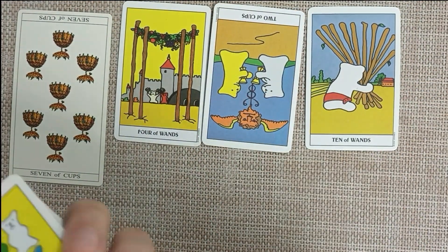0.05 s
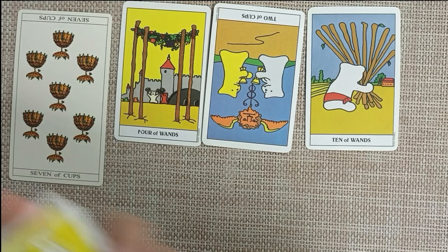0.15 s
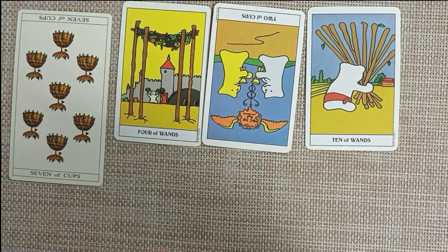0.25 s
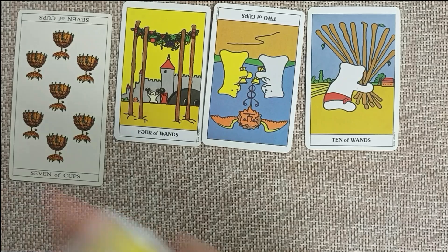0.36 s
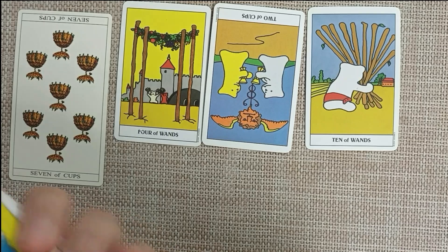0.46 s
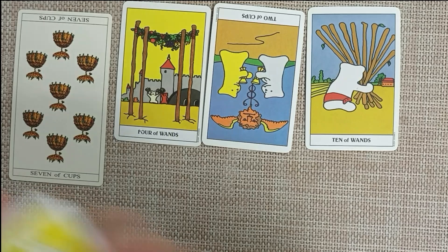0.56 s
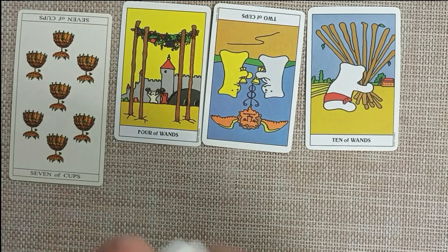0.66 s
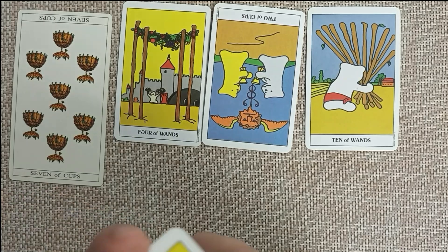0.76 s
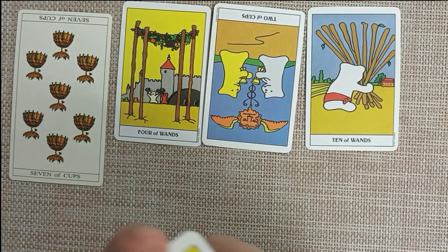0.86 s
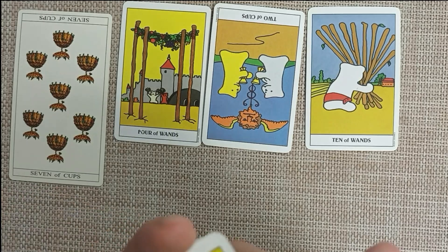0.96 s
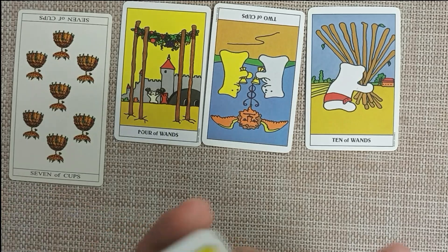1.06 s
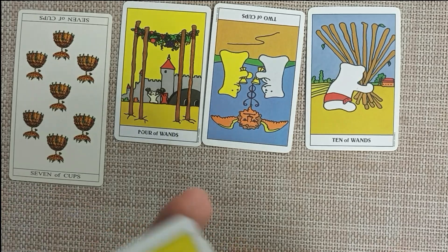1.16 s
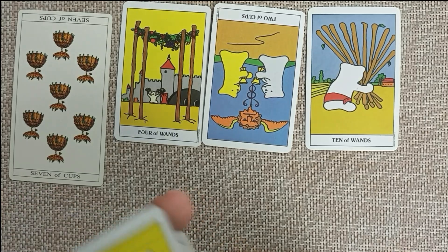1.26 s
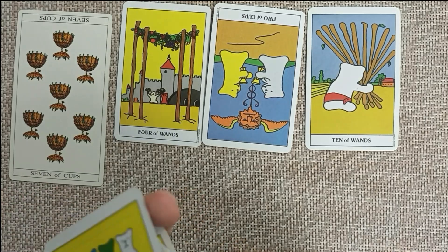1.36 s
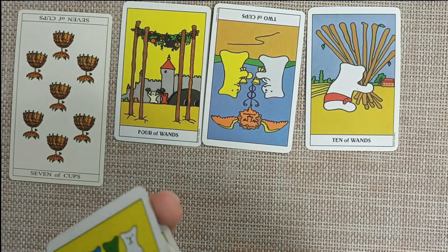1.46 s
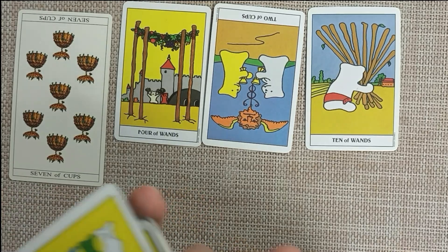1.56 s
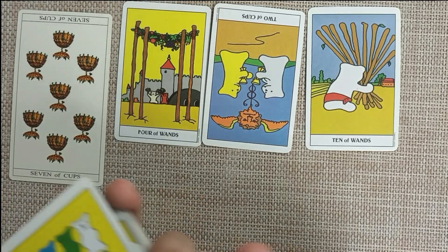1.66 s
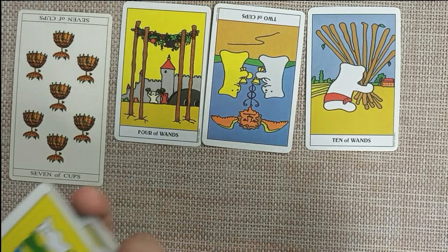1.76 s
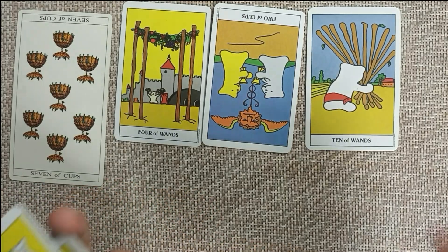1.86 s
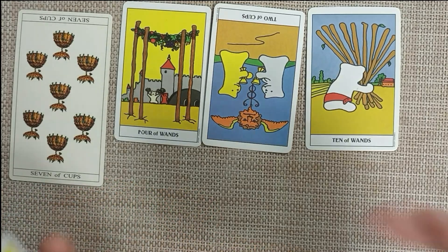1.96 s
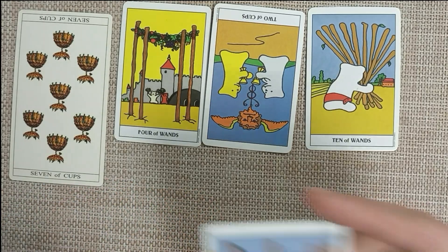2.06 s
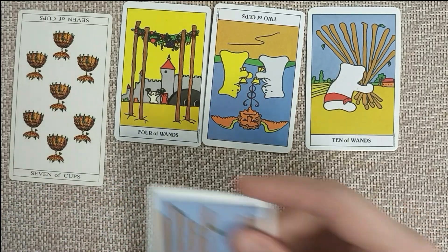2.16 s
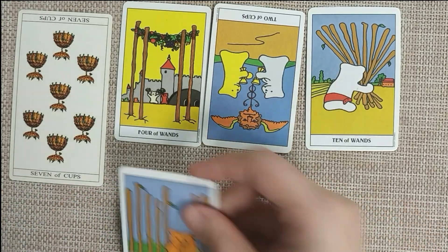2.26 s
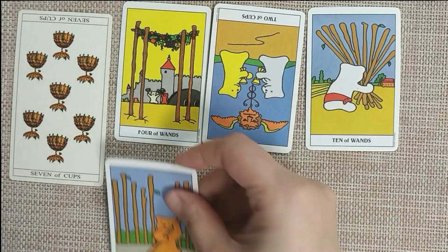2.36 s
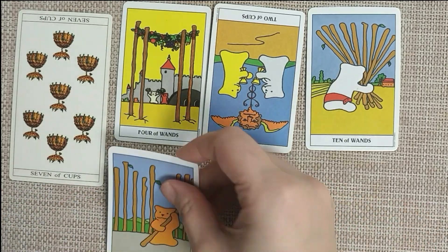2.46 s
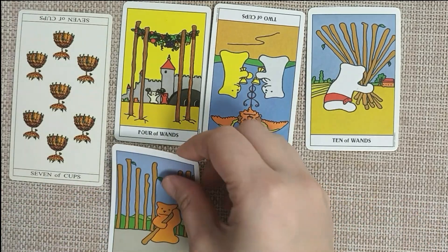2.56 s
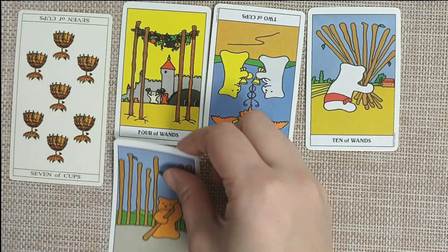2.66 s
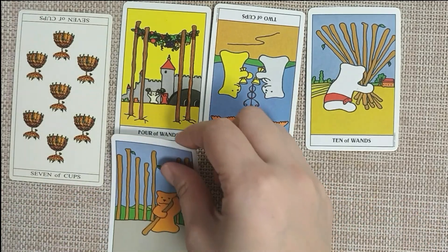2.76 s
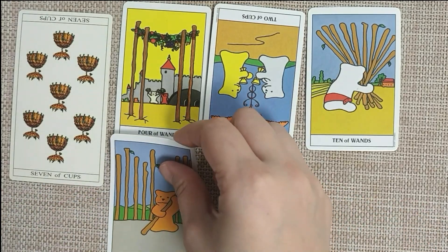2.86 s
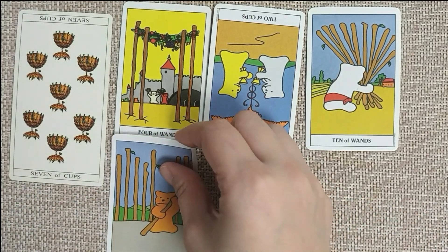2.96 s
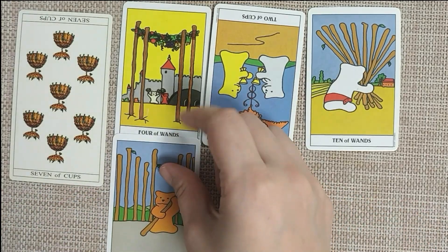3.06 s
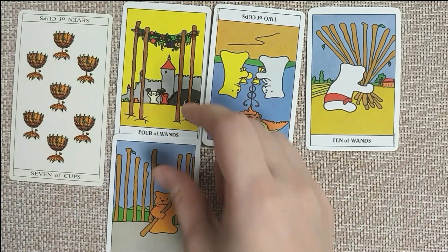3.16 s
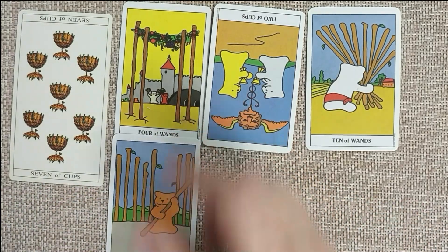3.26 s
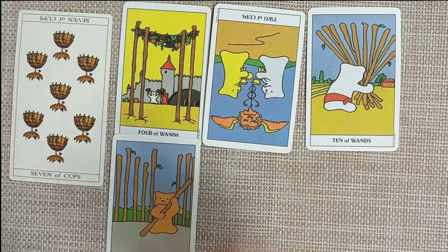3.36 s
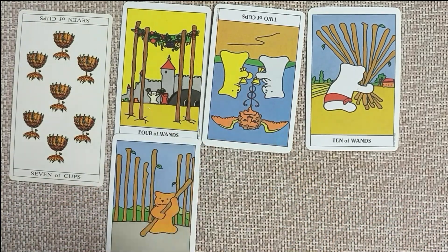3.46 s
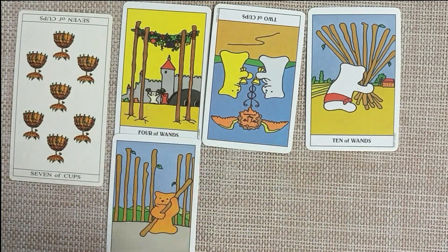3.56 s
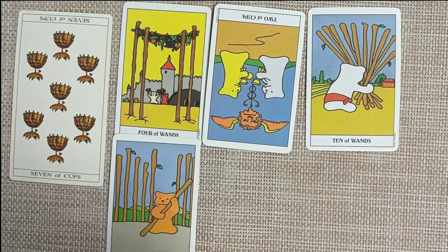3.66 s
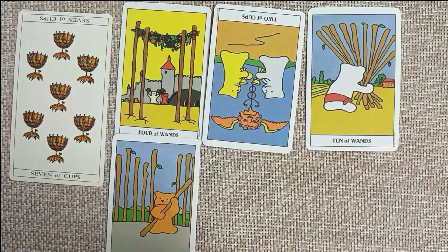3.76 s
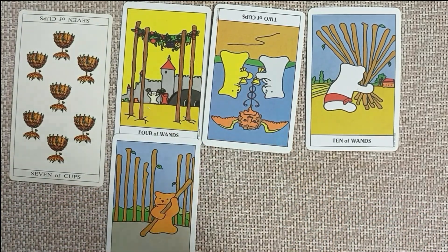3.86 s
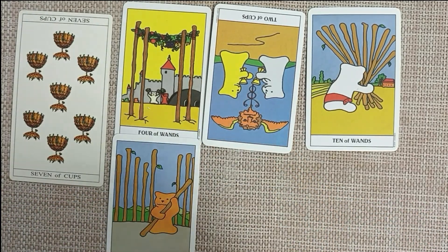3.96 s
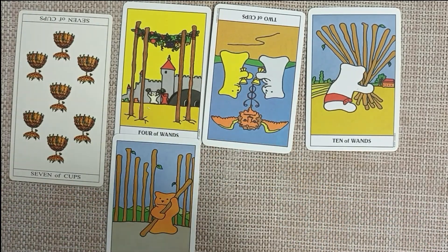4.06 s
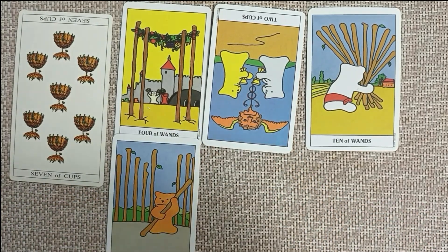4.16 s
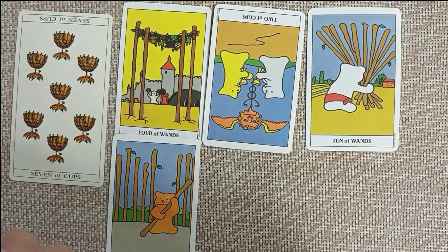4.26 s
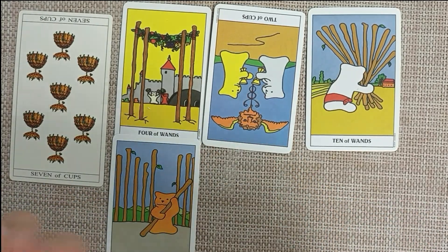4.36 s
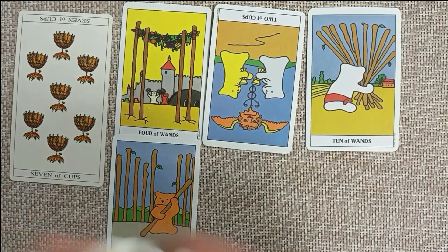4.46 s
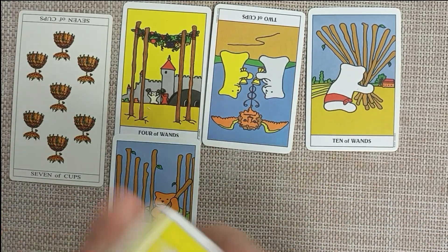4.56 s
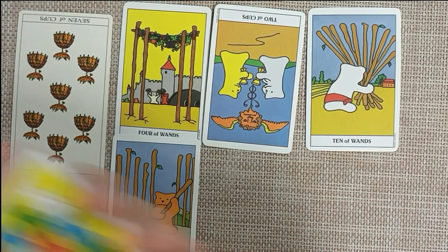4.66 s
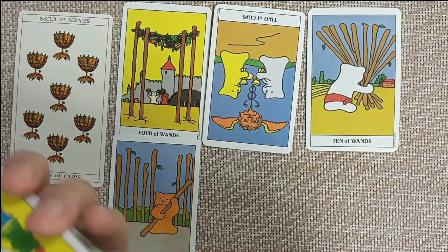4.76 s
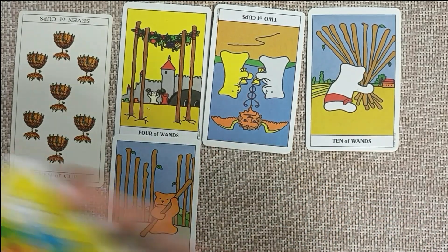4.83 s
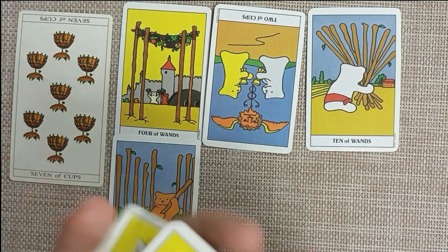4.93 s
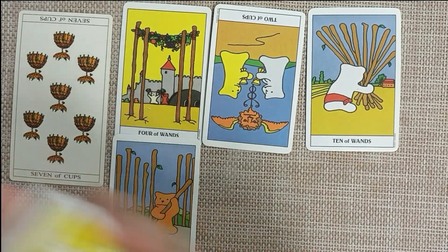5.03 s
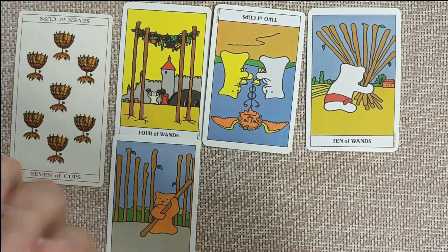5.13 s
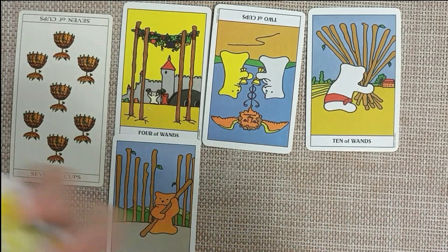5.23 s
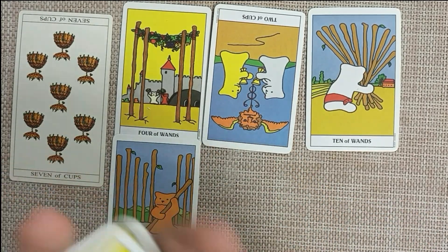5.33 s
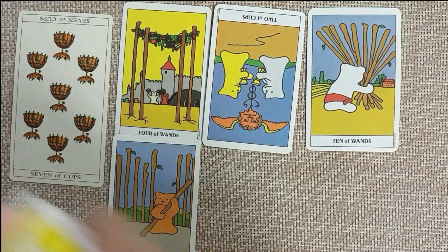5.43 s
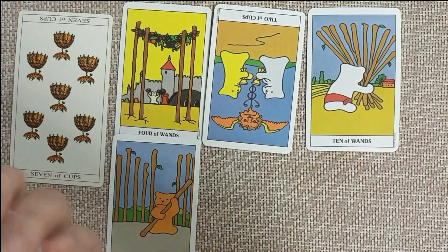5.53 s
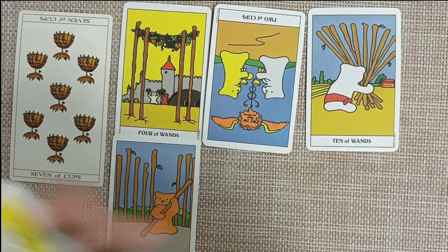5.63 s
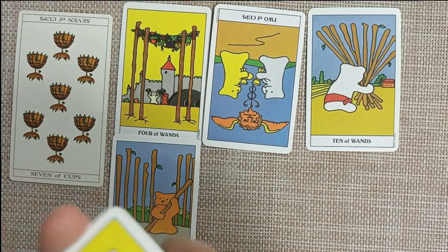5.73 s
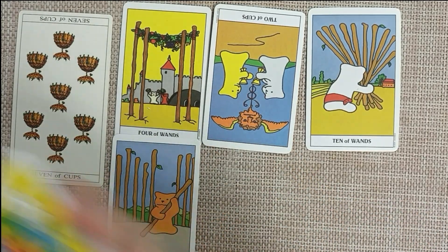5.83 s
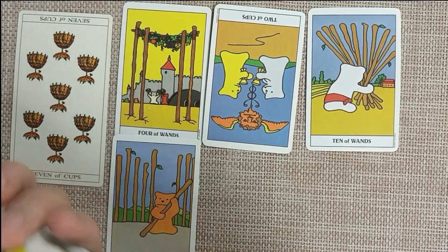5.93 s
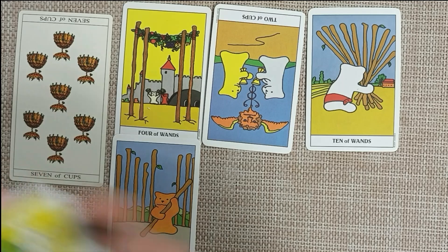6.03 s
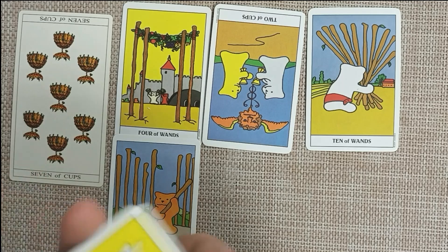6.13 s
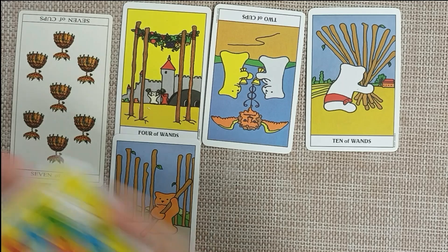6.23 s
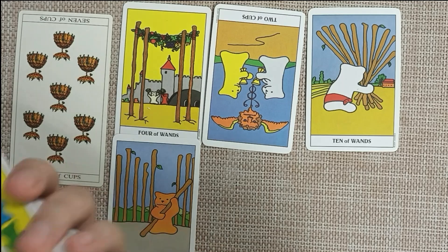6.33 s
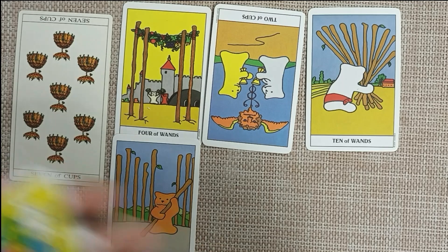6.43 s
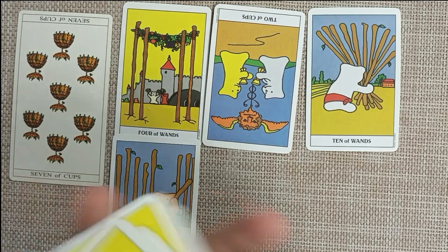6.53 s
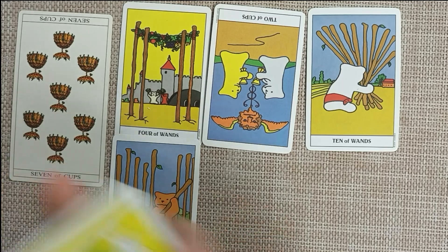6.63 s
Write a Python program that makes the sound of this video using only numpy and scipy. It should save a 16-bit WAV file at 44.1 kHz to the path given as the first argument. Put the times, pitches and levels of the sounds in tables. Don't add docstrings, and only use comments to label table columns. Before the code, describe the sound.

Hands shuffle a deck overhand above a cloth-covered table, papery hisses and crisp ticks, with one loud card snap between two shuffling bouts.

```python
import sys
import numpy as np
from scipy import signal
from scipy.io import wavfile
from scipy.ndimage import uniform_filter1d

SR = 44100
rng = np.random.default_rng(int(sys.argv[2]) if len(sys.argv) > 2 else 0)


def nominal_scale(level):
    x = np.asarray(level, float) / 20
    return 10 ** x


def to_wav(s):
    ch = np.atleast_2d(s).T
    pcm = np.round(np.clip(ch, -1, 1) * 32767)
    wavfile.write(sys.argv[1], SR, pcm.astype(np.int16))


N = 295029

# hz, level_db
ROOM_SPECTRUM = [(53, -4), (90, -6), (244, -6.5), (499, -16.5), (737, -17.5), (858, -17.5), (1210, -20),
                 (1320, -15.5), (1640, -16), (3590, -27), (4960, -25), (7660, -33.5), (10600, -27),
                 (16000, -35.5)]
# time_s, level_db
ROOM_GAIN = [(0.0, -50.5), (0.47, -51), (0.63, -51.5), (0.84, -47), (2.03, -42), (2.29, -43), (2.66, -45.5),
             (2.86, -52.5), (3.15, -49), (3.82, -45.5), (4.01, -49.5), (4.64, -50), (5.01, -52.5),
             (5.46, -47.5), (5.63, -51.5), (6.04, -47), (6.33, -46.5), (6.69, -52.5)]
# pitch_hz, width_hz, level_db (re room tone)
DRONES = [
    (159.3, 6.6, 5.5),
    (217.7, 5.3, -11),
]
# hz, likeness_0_1
ROOM_LIKENESS = [(60, 0.94), (200, 0.84), (400, 0.7), (1200, 0.059), (3000, 0.097), (15000, 0.082)]
# start_s, length_s, level_db
SWINGS = [(0.0, .02, -57), (0.16, 0.091, -45.5), (0.694, 0.058, -47), (0.93, 0.12, -46.5),
          (1.19, 0.24, -46), (1.68, 0.1, -38.5), (2, 0.7, -43.5), (3.2, 0.12, -47), (3.943, 0.037, -46),
          (4.25, 0.026, -47), (5.3, 0.09, -46.5), (5.479, 0.047, -38), (5.86, 0.67, -45), (6.68, .02, -50)]
# hz, t60_s
WALL_DECAY = [(300, 0.2), (2000, 0.2), (6000, 0.38), (12000, 0.2)]
# time_s, left_right_db
DECK_SIDE = [(0.0, -3), (0.43, -4.5), (1.13, -3), (1.65, -4.5), (1.99, -1.5), (2.76, -1), (4.49, -3.5),
             (4.62, -1.5), (4.86, -4), (5.38, -2), (5.68, -2.5), (6.69, -4)]
# hz, level_db
CARD_SPECTRUM = [(71, -50), (120, -7), (163, -11.5), (454, -17.5), (892, -16.5), (1160, -19), (2070, -12),
                 (2480, -17.5), (3300, -12.5), (8400, -14.5), (10400, -1.5), (12800, -14), (16000, -18.5)]
# low_hz, high_hz, left_right_likeness
BANDS = [
    (112, 1456, 0.54),
    (1620, 8100, 0.15),
    (5740, 17600, 0.038),
]
BAND_LEAN = [
    1,
    1.79,
    2,
]
# hz, level_db
LEFT_PORT = [(300, -3.5), (2000, 3), (8000, 6), (15000, -1.5)]
# start_s, peak_db, pitch_hz, t60_s
KNOCKS = [(0.00101, -6.5, 1350, 0.024), (0.16, -18.5, 722, 0.054), (0.331, -9.5, 2700, 0.0067),
          (0.361, -19, 1600, 0.029), (0.3315, -12, 1500, 0.012), (0.365, -25, 750, 0.044),
          (0.76, -16, 1670, 0.024), (1.624, -24, 650, 0.043), (2.069, -16, 2510, 0.03),
          (2.189, -26, 2120, 0.026), (3.099, -32, 2050, 0.03), (4.243, -20, 390, 0.04),
          (4.253, -18, 950, 0.035), (4.298, -13, 3120, 0.018), (4.442, -13, 2600, 0.011),
          (4.673, -21, 4000, 0.014), (5.102, -20, 3130, 0.015), (5.365, -18, 2160, 0.014),
          (5.481, -22, 3750, 0.022), (5.852, -19, 2080, 0.045), (6.8, -8, 3470, 0.0095),
          (6.48, -19.5, 950, 0.023), (2.8027, -1.5, 3980, 0.012), (2.8035, -2.5, 7400, 0.01),
          (2.801, -3.5, 11000, 0.024), (5.476, -14, 5900, 0.02), (5.55, -28, 3400, 0.03),
          (0.296, -18.5, 670, 0.058), (5.978, -34, 2080, 0.016), (6.093, -35, 2800, 0.026),
          (4.706, -28, 4250, 0.02), (3.9, -29, 1800, 0.012), (3.999, -14, 6000, 0.015),
          (3.991, -14, 6000, 0.011), (4.01, -19, 6000, 0.01), (3.992, -27, 1940, 0.012),
          (3.9995, -19, 1970, 0.015), (5.853, -23, 930, 0.022), (2.169, -28, 2050, 0.022),
          (2.17, -28, 2300, 0.056), (2.213, -33, 2950, 0.044), (2.11, -38, 2900, 0.06),
          (1.6175, -22.5, 897, 0.024), (2, -36, 1700, 0.04), (2.2, -30, 380, 0.06),
          (4.392, -29, 2150, 0.06), (4.378, -32, 3300, 0.05), (0.17, -21, 300, 0.07),
          (4.25, -18.5, 304, 0.078), (2.8, -21.5, 295, 0.051), (6.305, -24, 3900, 0.055),
          (4.294, -26, 950, 0.03)]
# peak_s, hiss_db, swell_s (per 20 dB)
PULLS = [
    (0.135, -24, 0.05),
    (4.003, -21.5, 0.16),
    (4.416, -29, 0.2),
    (4.769, -42, -0.6),
    (4.842, -31, 0),
    (5.232, -25, 0),
    (5.62, -22.5, -0.05),
    (6.031, -25, 0.15),
    (6.488, -19.5, 0.0668),
]
# start_s, hiss_db, fade_s (per 20 dB)
SETTLES = [(0.0, -22.5, 0.06), (0.181, -36.5, 0.1), (0.376, -40, -0.07), (2.822, -38.5, -0.17),
           (4.259, -31.5, 0.31), (4.666, -37, 0.24), (5.061, -65, 2), (5.109, -34.5, 0.35),
           (5.3, -43.5, 0.4), (5.489, -25, 0.0655), (5.646, -45, 0.1), (5.868, -35.5, 0.34),
           (6.31, -32, 0.12), (6.529, -44.5, 0.14)]
# (below 6 kHz, re hiss)
RUBS = [(0.651, 0.037, -52.5, 7.5), (0.789, 0.25, -42, -2.5), (1.283, 0.059, -39, 1),
        (1.365, 0.058, -33, 2), (1.48, 0.044, -43.5, 7.5), (1.571, 0.015, -33, -8),
        (1.784, 0.15, -42.5, -4.5), (1.885, 0.12, -39.5, 0.5), (2.096, 0.091, -42.5, 3),
        (2.222, .1, -55, 2.5), (3.108, 0.033, -43, 0.5), (3.286, 0.13, -47.5, -2.5),
        (3.336, 0.082, -39.5, -0.5), (3.47, 0.073, -45.5, -0.5), (3.634, 0.035, -37, -3),
        (3.676, 0.041, -44, -9), (3.79, 0.1, -66, -2.5), (4.29, 0.051, -49, 6), (5.546, 0.033, -30.5, -3),
        (6.156, 0.02, -54, 3), (6.425, 0.034, -28, -20), (6.537, 0.0084, -56, -6), (0.116, 0.039, -31, -17),
        (0.413, 0.046, -46, 1.5), (4.796, 0.044, -28.5, -13.5), (1.603, 0.011, -49, 7),
        (5.878, 0.01, -39, -9)]
# time_s, hiss_db, thud_db (re hiss), knock_db (re hiss), fade_ms (per 6 dB)
SLAPS = [(0.002, -8.5, -9.5, -0.5, 2), (0.1625, -31.5, 9.5, 10, 6), (0.2903, -24, -3, -1, 7),
         (0.2935, -22.5, -3.5, -4, 1), (0.3309, -8, -11, -1.5, 1), (0.3633, -21, 4, 1.5, 1),
         (0.76, -26, -8.5, -7, 4), (1.6173, -12, -18, -12, 1), (1.766, -19.5, -18.5, -16, 4),
         (2.0675, -33, 3.5, 5.5, 2.5), (2.8031, -2, -10, -3, 0.8), (4.2445, -20, 0, 2.5, 3.5),
         (4.2534, -18.5, -3.5, 1, 6.5), (4.2917, -24, -5, 4, 1), (4.2953, -27.5, 2.5, 7, 0.5),
         (4.4415, -18, -13.5, 0.5, 4.5), (4.648, -13, -11.5, -0.5, 0), (4.649, -3.5, -22, -6, 1.5),
         (4.6728, -23.5, -2, 2.5, 4), (5.0933, -20.5, -4, 0.5, 4), (5.1019, -7.5, -16.5, -5, 1),
         (5.4731, -12, -9, -4, 7.5), (5.485, -28, -1, -14, 3), (5.8515, -19.5, 1, 1, 5),
         (6.2913, -8.5, -9.5, 1.5, 1.5), (6.481, -10.5, -13.5, -11, 2.5)]
# time_s, hiss_db, knock_db (re hiss), swell_ms (per 6 dB)
FLICKS = [(5.859, -10, -6, 1), (0.1853, -16.5, -15, 2.5), (1.4013, -27, -5, 12), (2.8019, 0.5, -14, 0.44),
          (2.8045, -5.5, -9, 0.5), (0.092, -29, -15, 5), (0.122, -25.5, -20, 4.5), (4.6535, -17, -9, 0.5),
          (5.594, -15, -20, 1), (0.3735, -20, 1, 0), (5.632, -15, -20, 0.5), (3.9914, -9.5, -11, 1.3),
          (4, -9, -11, 1), (4.004, -10.5, -14.5, 2), (4.0107, -10, -20, 1), (4.015, -18, -20, 0.5),
          (4.394, -21, -15, 3.5), (4.4045, -10.5, -16, 2.5), (4.412, -7.5, -21, 3),
          (4.419, -10.5, -32, 1.5), (4.425, -13, -29, 2), (4.433, -18, -25, 1.5), (4.764, -19.5, -9.5, 4.5),
          (4.8332, -9, -13, 1), (4.8464, -8, -19, 2), (5.1154, -20.5, -30, 3.5), (5.232, -16, -24, 0.5),
          (5.2405, -13.5, -18, 1), (5.244, -17, -20, 1), (5.4935, -15, -19, 2), (5.508, -21, -24, 2),
          (5.582, -21, -33, 5.5), (5.5884, -17, -26, 5.5), (5.6123, -12.5, -30, 3.5),
          (5.6203, -7.5, -20, 2), (5.626, -9.5, -19, 2), (6.044, -21, -30, 1.5), (6.0615, -13, -7.5, 0.67),
          (5.513, -24, -20, 1), (6.018, -22.5, -24, 2), (6.038, -23, -24, 1), (4.808, -26, -20, -1.5),
          (4.817, -19, -15, 0), (4.825, -21, -18, 0.5), (0.14, -24.5, -11, 6), (5.477, -9.5, -13, 0.5),
          (5.222, -26.5, -24, 16), (6.305, -23, -3, 4), (6.4535, -18.5, -18, 3.5), (6.488, -7.5, -17, 2),
          (6.493, -10.5, -20, 2), (6.498, -13, -20, 1), (6.504, -13.5, -20, 0.8), (6.447, -21, -16, 2),
          (6.475, -20, -20, 5)]
# time_s, hiss_db, knock_db (re hiss), swell_ms (per 6 dB)
TAPS = [(0.177, -28, -2, 9), (0.166, -29, 5, 0.5), (4.228, -36, -7, 2), (0.376, -27, 0, 7.5),
        (0.679, -34.5, 5.5, 1.5), (0.691, -40, 9, 1.5), (0.8371, -41.5, 5, 4), (1.1224, -42, -3, 3),
        (1.529, -37, 6.5, 2.5), (1.626, -35.5, -22, 12), (1.871, -38, 3, 5), (2.17, -44, 6, 0),
        (2.19, -37, 10, 0), (2.213, -45, 4, 8), (2.795, -24.5, 7.5, 1), (3.104, -38.5, 1, 0.9),
        (3.132, -38, -3, 2), (3.339, -35, 7, 0), (3.413, -34, -2, 1), (4.023, -31, 0.5, 7),
        (4.234, -38, -4, 3), (4.6829, -18, 2, -0.5), (4.706, -31, 6, 1.5), (5.049, -38, 5, 0.5),
        (5.0595, -46.5, 8, 7), (5.155, -38, 2.5, 4.5), (5.259, -24.5, -2.5, 3), (5.3662, -26.5, 1.5, 1.8),
        (5.6406, -20.5, -6, 1.5), (5.875, -22, 1.5, 4.5), (5.9765, -31.5, -0.5, 11),
        (6.514, -20, -5.5, 1.5), (4.662, -27.5, 5, 1), (4.742, -35, 3, 1.5), (1.293, -38, -1.5, 4),
        (1.471, -39, 2.5, 1), (1.566, -35, 0, 2.5), (2.798, -20.5, 4.5, 1), (5.55, -34, 4, 2.5),
        (5.885, -27, 1, 3), (5.866, -24, 2, 0.5), (1.378, -31, -9, 4), (1.42, -31, -2, 6),
        (6.552, -44.5, 6, 1.5), (6.651, -46, 5.5, 1), (4.267, -22.5, -2, 4.5), (6.322, -30.5, 3, 2),
        (0.357, -33, 3, 0.5), (1.611, -36, 3, 2)]

CARD_LAG_SAMPLES, ROOM_LAG_SAMPLES = 44, 33
WALL_BUILD_S = 0.034
SWING_SWELL_S, SWING_FADE_S, STILL_DB = 0.13, 0.26, -54
PULL_FADE_S, PULL_SCRAPE_DB = 0.053, -14
SETTLE_SWELL_S, SETTLE_SCRAPE_DB = 0.006, -1
RUB_SWELL_S, RUB_FADE_S, REST_DB, REST_SCRAPE_DB = 0.043, 0.061, -60.5, 2
SLIDE_BEND = 0.96
SLAP_SWELL_MS, SLAP_LEAD_S = 0.12, -0.0006
CRACK_DB, CRACK_FADE_MS = 2.5, 0.26
FLICK_THUD_DB, FLICK_FADE = -14, 1.34
TAP_THUD_DB, TAP_FADE = -12, 1.42


def evened(x):
    return x / np.sqrt(np.mean(x ** 2) + 1e-20)


def read(points, hz):
    f, value = np.transpose(points)
    return np.interp(np.log(hz + 1), np.log(f + 1), value)


def along(rows, t, axis=1):
    rows = np.asarray(rows)
    return np.interp(t, rows[:, 0], rows[:, axis])


def add(mix, s, sound):
    part = mix[..., round(s * SR):][..., :sound.shape[-1]]
    part += sound[..., :part.shape[-1]]


def drift(patches, frames, bins):
    return evened(uniform_filter1d(uniform_filter1d(patches, frames, 0), bins, 1))


def stroke(t, start, hold, swell, fade, bend):
    before = (start - t) / max(swell, 1e-4)
    after = (t - start - hold) / max(fade, 1e-4)
    return -20 * np.maximum(np.maximum(before, after), 0) ** bend


def grit(size_db, hold_s):
    jumps = evened(uniform_filter1d(rng.standard_normal(N), max(int(hold_s * SR), 1)))
    return evened(nominal_scale(size_db * jumps))


def room():
    frames, hz = N // 512 + 5, np.fft.rfftfreq(2048, 1 / SR)
    a, b, c, d, patches = rng.standard_normal((frames, 1025, 5)).T
    same = np.clip(read(ROOM_LIKENESS, hz), 0, 1)[:, None]
    right = a + 1j * b
    late = np.exp(-2j * np.pi * hz * ROOM_LAG_SAMPLES / SR)[:, None]
    left = late * (same * right + np.sqrt(1 - same ** 2) * (c + 1j * d))
    drones = sum(nominal_scale(db) / (1 + ((hz - f) / width) ** 2) for f, width, db in DRONES)
    spectrum = (nominal_scale(read(ROOM_SPECTRUM, hz)) + drones)[:, None]
    z = np.array([left, right]) * spectrum * nominal_scale(2.1 * drift(patches, 12, 8))
    tone = evened(signal.istft(z, nperseg=2048, noverlap=1536)[1][:, :N])
    return tone * nominal_scale(along(ROOM_GAIN, np.arange(N) / SR) + 4.5)


def rumble():
    a, b = rng.standard_normal((2, N))
    band = signal.butter(3, [34, 130], "bandpass", fs=SR, output="sos")
    lows = signal.sosfilt(band, [a + 0.11 * b, a - 0.4 * b])
    boom = signal.lfilter(*signal.iirpeak(43, 2.5, SR), lows)
    t = np.arange(N) / SR
    coarse = t[::64]
    power = nominal_scale(STILL_DB) ** 2
    for s, hold, db in SWINGS:
        power = power + nominal_scale(db + stroke(coarse, s, hold, SWING_SWELL_S, SWING_FADE_S, 0.77)) ** 2
    return evened(lows + 2.5 * boom) * grit(2.1, 0.07) * np.interp(t, coarse, np.sqrt(power))


def walls(x):
    taps = np.zeros((2, SR // 2))
    at = np.arange(200, SR // 2 - 20, 20)
    at = at + rng.integers(0, 20, (2, len(at)))
    np.put_along_axis(taps, at, rng.choice([-1., 1.], at.shape), 1)
    hz, t, z = signal.stft(taps, SR, nperseg=128)
    decay = nominal_scale(-60 * t / read(WALL_DECAY, hz)[:, None])
    build = np.clip(t / WALL_BUILD_S, 0, 1) ** 3
    tail = signal.istft(z * decay * build, SR, nperseg=128)[1]
    return signal.fftconvolve(x, tail / np.linalg.norm(tail[0]), axes=1)[:, :N]


def knocks():
    out, u = np.zeros(N), np.arange(3000) / SR
    spreads = np.resize(rng.uniform(1.05, 1.4, 20), len(KNOCKS))
    for (s, db, hz, t60), spread in zip(KNOCKS, spreads):
        pair = np.sin(2 * np.pi * hz * u) + 0.26 * np.sin(2 * np.pi * hz * spread * u)
        level = nominal_scale(db - 3.0 - 60 * u / max(t60, 0.004))
        add(out, s, level * np.minimum(u / 0.00015, 1) * pair)
    return out


def slides(t):
    rows = [(s, 0, db, PULL_SCRAPE_DB, swell, PULL_FADE_S) for s, db, swell in PULLS]
    rows += [(s, 0, db, SETTLE_SCRAPE_DB, SETTLE_SWELL_S, fade) for s, db, fade in SETTLES]
    rows += [(*row, RUB_SWELL_S, RUB_FADE_S) for row in RUBS]
    rows += [(0, t[-1], REST_DB, REST_SCRAPE_DB, 1, 1)]
    power = 0
    for s, hold, db, scrape_db, swell, fade in rows:
        bands_db = np.array([[1.77 * scrape_db - 10.5], [scrape_db], [0]])
        power = power + nominal_scale(db + stroke(t, s, hold, swell, fade, SLIDE_BEND) + bands_db) ** 2
    return power


def landings():
    ticks = [(s - SLAP_LEAD_S, db, thud_db, knock_db, SLAP_SWELL_MS, fade)
             for s, db, thud_db, knock_db, fade in SLAPS]
    ticks += [(s, db + CRACK_DB, thud_db, knock_db, swell, CRACK_FADE_MS)
              for s, db, thud_db, knock_db, swell, _ in ticks]
    ticks += [(s, db, knock_db + FLICK_THUD_DB, knock_db, w, FLICK_FADE * w) for s, db, knock_db, w in FLICKS]
    ticks += [(s, db, knock_db + TAP_THUD_DB, knock_db, w, TAP_FADE * w) for s, db, knock_db, w in TAPS]
    power = np.zeros((3, N + 4000))
    ms = np.arange(-2000, 2000) * 1000 / SR
    for s, db, thud_db, knock_db, swell_ms, fade_ms in ticks:
        shape_db = -6 * np.maximum(-ms / max(swell_ms, 0.1), ms / max(fade_ms, 0.2)) ** 1.05
        bands_db = np.array([[thud_db], [knock_db], [0]])
        add(power, s, nominal_scale(db + 0.5 + bands_db + shape_db) ** 2)
    return power[:, 2000:N + 2000]


def strengths():
    t = np.arange(N) / SR
    coarse = t[::32]
    rubbing = np.array([np.interp(t, coarse, band) for band in np.sqrt(slides(coarse))])
    rubbing *= grit(1.9, 0.003) * grit(2.4, 0.0005)
    lean_db = np.outer(BAND_LEAN, along(DECK_SIDE, t))
    sides = nominal_scale(np.multiply.outer([0.5, -0.5], lean_db))
    return sides * np.sqrt(landings()) * grit(4.1, 0.00022), sides * rubbing


def blotchy(patchy_db):
    a, b, c, d, patches = rng.standard_normal((N // 128 + 4, 129, 5)).T
    z = np.array([a + 1j * b, c + 1j * d]) * nominal_scale(patchy_db * drift(patches, 5, 12))
    return evened(signal.istft(z, nperseg=256, noverlap=128)[1][:, :N])


def colour(low_hz, high_hz):
    hz = abs(np.fft.fftfreq(4096, 1 / SR)) + 1
    edges = 1 / np.sqrt((1 + (low_hz / hz) ** 6) * (1 + (hz / high_hz) ** 6))
    log_gain = np.log(nominal_scale(read(CARD_SPECTRUM, hz)) * edges + 1e-5)
    taps = np.fft.ifft(np.exp(np.conj(signal.hilbert(log_gain)))).real[:1024]
    t60_s = 12 / low_hz + 0.006
    taps = taps * nominal_scale(-60 * np.arange(1024) / SR / t60_s)
    return taps / np.linalg.norm(taps)


def cards():
    landing, rubbing = strengths()
    out = knocks() * nominal_scale([[-1.5], [0]])
    (a, b), (c, d) = blotchy(2.1), blotchy(2.4)
    for k, (low_hz, high_hz, same) in enumerate(BANDS):
        other = np.sqrt(1 - min(same, 1) ** 2)
        slips = landing[:, k] * [same * a + other * b, a]
        slips = slips + rubbing[:, k] * [same * c + other * d, c]
        out += signal.oaconvolve(slips, colour(low_hz, high_hz)[None])[:, :N]
    hz = np.linspace(0, SR / 2, 33)
    port = signal.firwin2(2 * CARD_LAG_SAMPLES + 1, hz, nominal_scale(read(LEFT_PORT, hz)), fs=SR)
    out[0] = signal.oaconvolve(out[0], port)[:N]
    return out


def scene():
    near = cards()
    return near + nominal_scale(-28.5) * walls(near) + room() + rumble()


def roll_off(x):
    return signal.sosfilt(signal.butter(12, 15900, fs=SR, output="sos"), x)


def record(dry):
    mix = np.clip(dry, -1, 1)
    return roll_off(mix)


dry = scene()
out = record(dry)
to_wav(out)
```